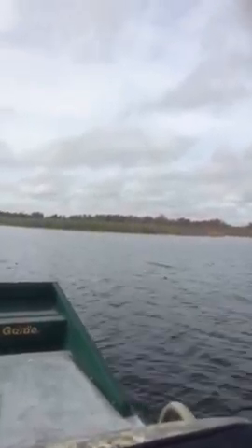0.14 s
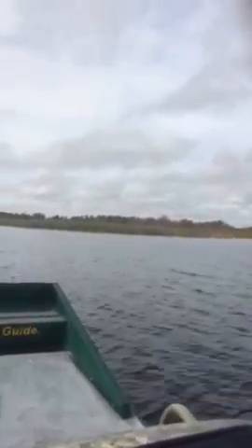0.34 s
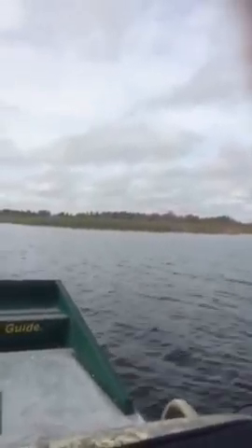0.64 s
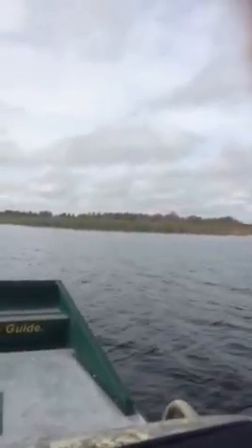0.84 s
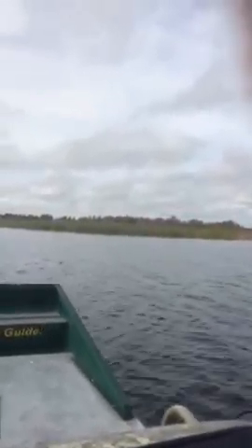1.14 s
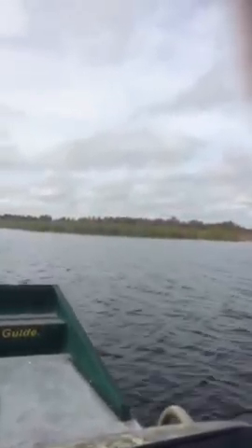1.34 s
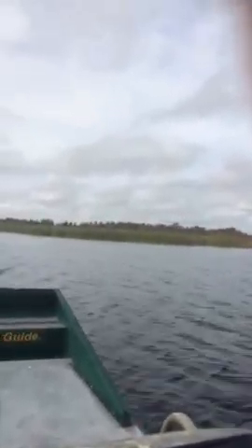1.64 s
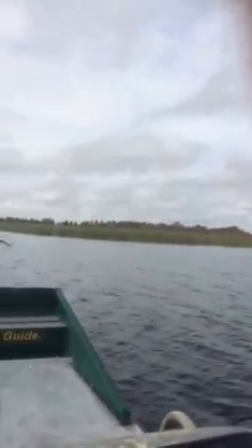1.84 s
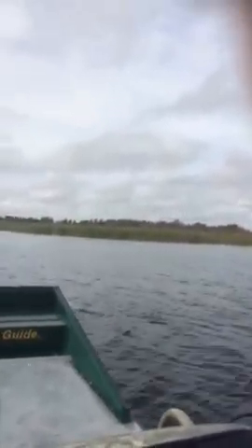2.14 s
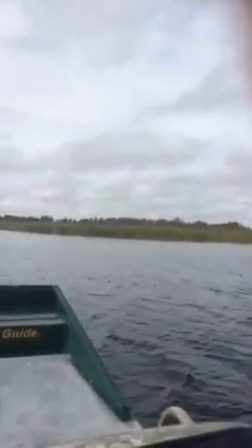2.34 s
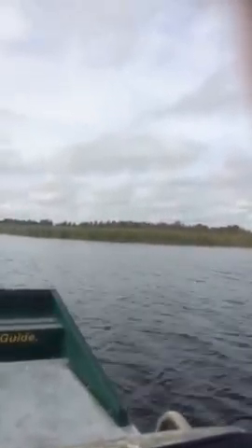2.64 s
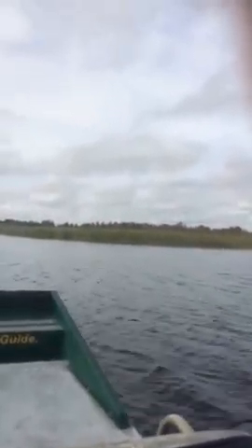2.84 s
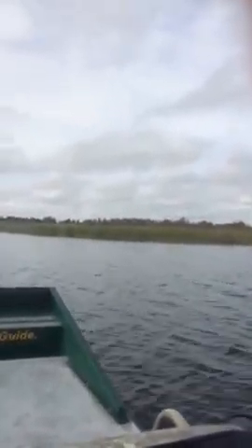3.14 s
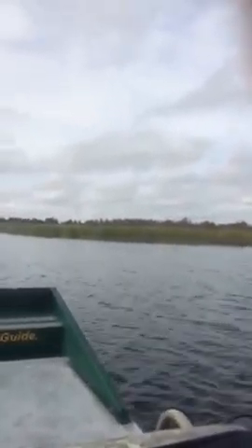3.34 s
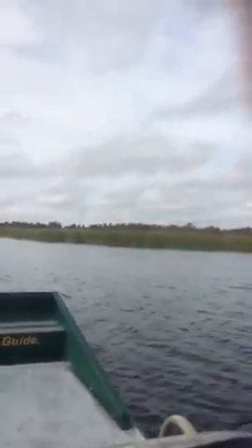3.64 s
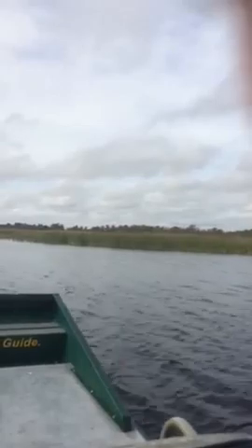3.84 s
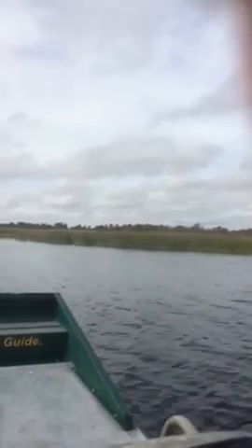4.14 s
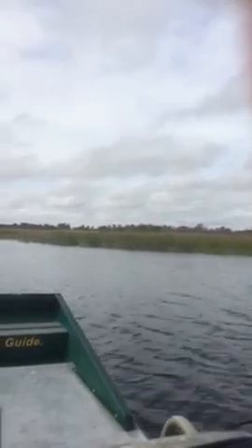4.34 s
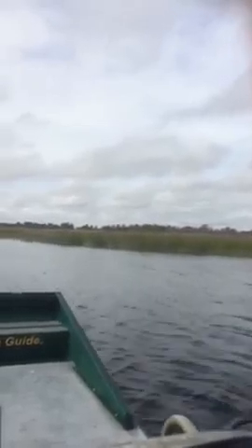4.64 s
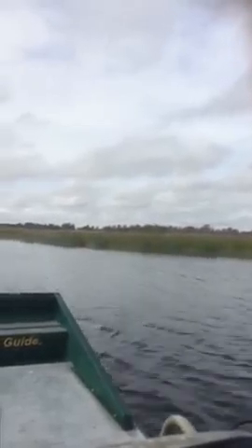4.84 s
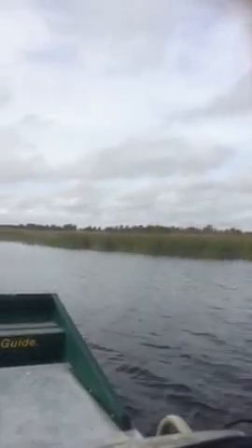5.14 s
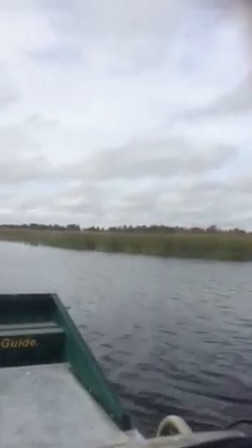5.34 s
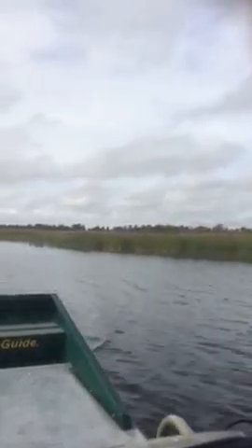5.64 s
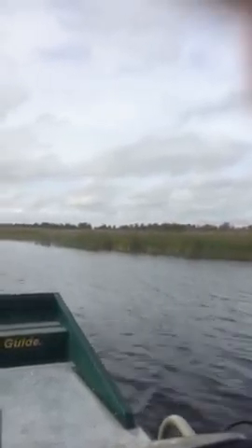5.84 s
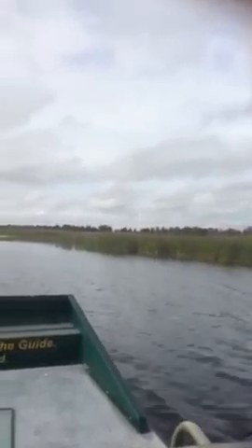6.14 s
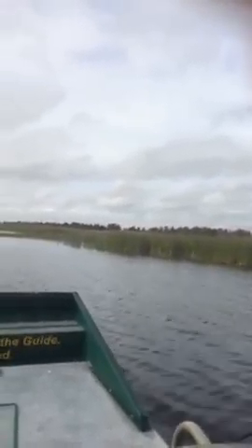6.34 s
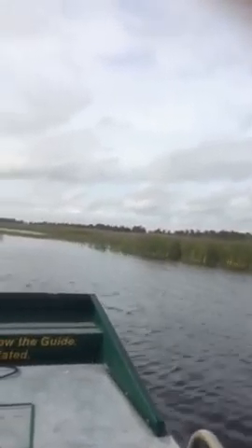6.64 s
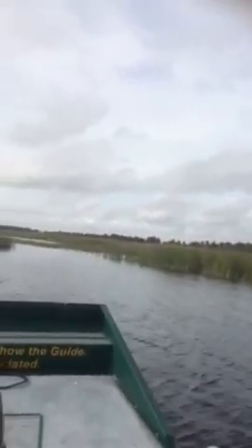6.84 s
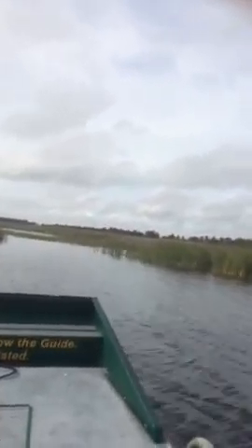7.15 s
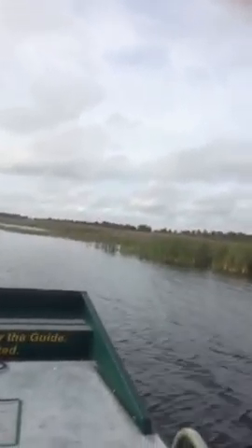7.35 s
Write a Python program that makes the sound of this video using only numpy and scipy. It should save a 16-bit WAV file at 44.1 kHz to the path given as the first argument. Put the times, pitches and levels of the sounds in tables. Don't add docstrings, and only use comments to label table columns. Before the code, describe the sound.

A loud, swaying airboat engine drone with a deep hum and propeller throb, wrapped in rushing wind hiss and scattered knocks of slapping water.

```python
import sys
import numpy as np
from scipy import signal
from scipy.fft import rfft, irfft
from scipy.io import wavfile
from scipy.ndimage import uniform_filter1d, minimum_filter1d

SR = 44100
rng = np.random.default_rng(int(sys.argv[2]) if len(sys.argv) > 2 else 0)


def voltage_ratio(decibels):
    exponent = np.asarray(decibels, float) / 20
    return 10 ** exponent


def generate_wav(signal):
    frames = np.transpose(np.atleast_2d(signal))
    scaled = np.clip(frames, -1, 1) * 32767
    pcm = np.round(scaled).astype(np.int16)
    wavfile.write(sys.argv[1], SR, pcm)


N = 330750

# (time [s], firing rate [Hz])
ENGINE_SPEED = [(0, 203.2), (.75, 201.7), (1.25, 201.4), (1.5, 201.8), (1.8, 201.2), (2, 200.4),
                (2.25, 198.4), (2.5, 197.4), (2.75, 197.0), (3.25, 198.0), (3.75, 198.7), (4.25, 198.2),
                (4.75, 195.8), (5.5, 192.4), (6, 190.5), (6.25, 188.7), (6.75, 188), (7.5, 187.8)]
# (time [s], settling time [s])
THROTTLE_EASINGS = [
    (2.07, 0.11),
    (5.15, 1),
    (6.5, 0.23),
]
EXHAUST_ORDERS = {5: (-14, -12, -14, -16.5), 8: (-13.5, -14, -7, -8.5), 11: (-26.5, -22, -41, -29),
                  24: (-49, -50, -37.5, -44)}
# (order [per camshaft turn], level [dB])
UNEVEN_ORDERS = [(4, -28), (6, -28), (9, -32), (10, -35.5), (12, -37)]
# (time [s], length [s], rise [dB])
FIRING_SURGES = [
    (.25, 0.22, 2),
    (.95, 1, 2.5),
    (2.4, 0.41, 1),
    (3.75, 0.22, 1.5),
    (4.2, .4, 2),
    (4.8, 0.46, 1.5),
]
BLADE_LEVELS = {1: (-19.5, -25.5, -23, -41), 2: (-15.5, -19, -19, -24), 3: (-22, -29.5, -27, -37.5),
                4: (-29, -39, -48, -32.5), 6: (-37, -42.5, -33.5, -33.5)}
# (multiple [of blade passing], level [dB])
HIGH_BLADE_TONES = [(5, -42.5), (7, -49.5), (8, -43), (9, -46.5), (10, -46), (12, -56.5)]
# (time [s], level [dB])
BLADE_BITE = [(0, 0.5), (.4, 0), (1.1, -1), (1.9, -1.5), (2.25, -4), (2.6, 1.5), (3, -9.5), (3.4, 4.5),
              (4.1, -0.5), (4.5, 2.5), (4.9, -1.5), (5.3, -11.5), (5.7, -6), (6.4, 0.5), (7.1, 0.5),
              (7.5, -1)]
# (time [s], length [s], rise [dB])
GEAR_LOADS = [
    (1.3, .6, 6.5),
    (1.87, .25, 11),
    (2.4, 0.37, 11),
    (3.2, 0.76, 10),
    (3.8, .3, 6.3),
    (4.4, .4, 10),
    (4.95, .2, 8.2),
    (5.17, 0.27, 15.6),
    (5.95, 0.29, 10),
    (6.2, 0.22, 10),
]
# (frequency [Hz], density [dB per Hz])
BUFFET_SPECTRUM = [(20, -8), (35, -5), (55, 5.5), (95, 3.5), (150, 0), (230, -5.5), (400, -17)]
# (frequency [Hz], density [dB per Hz])
ROAR_SPECTRUM = [(200, -1), (290, -2.5), (400, -7), (600, -11), (900, -10.5), (1300, -16.5), (1650, -16.5),
                 (2200, -24.5), (3200, -35.5)]
# (frequency [Hz], density [dB per Hz])
HISS_SPECTRUM = [(900, -2.5), (1700, -4), (2700, -2.5), (4500, -4.5), (6500, -6), (8250, -10),
                 (10000, -14.5), (11500, -20), (15300, -19)]
# (time [s], length [s], rise [dB])
WIND_GUSTS = [(.185, 0.049, 21), (.36, 0.065, 15), (.55, 0.21, 4), (.79, 0.061, 0.5), (.92, 0.13, -1),
              (1.14, 0.06, 8), (1.33, 0.067, 17), (1.52, 0.04, 10), (1.76, 0.12, 8), (1.91, 0.11, -3),
              (2.03, 0.14, 8.5), (2.36, 0.17, 9), (2.56, 0.065, -8), (2.76, 0.16, 2), (3.02, 0.045, 10),
              (3.13, 0.11, 3.5), (3.26, 0.048, 8), (3.35, 0.054, 6), (3.5, 0.04, 9.5), (3.63, 0.06, 6.5),
              (3.88, .22, 10), (4.05, .06, -7), (4.28, 0.16, 11.5), (4.43, 0.056, 11), (4.81, 0.07, 4),
              (5.18, 0.098, 7.5), (5.37, 0.091, 6), (5.65, 0.086, 12), (6.32, 0.22, 7.5),
              (6.81, 0.075, 4.5)]
# (time [s], length [s], rise [dB])
SPRAY_SHEETS = [(.07, 0.12, 1), (.23, .05, 1), (.54, 0.032, 4), (.66, 0.22, 2), (.73, .06, 3),
                (.95, 0.47, 1.5), (1.18, 0.17, 2.5), (1.28, 0.12, 2.5), (1.42, 0.19, 1.5), (1.58, .06, 2),
                (1.7, 0.054, 2.5), (1.86, 0.094, 1.5), (1.98, 0.043, -1.5), (2.09, 0.05, 3.5),
                (2.36, .15, 3), (2.95, 0.073, 1.5), (3.04, .05, 2), (3.27, .07, 1.5), (3.38, 0.11, 1.5),
                (3.57, .06, 2.5), (3.66, 0.038, 2), (3.89, 0.21, 1.5), (4.0, 0.1, 2.5), (4.18, 0.3, 1.5),
                (4.37, 0.098, 1.5), (4.54, 0.063, -4), (5.57, .1, 0.5), (7.4, .06, 3.5)]
# (time [s], air pocket pitch [Hz], pocket level [dB], splash level [dB])
HULL_SLAPS = [(.042, 504, -4.5, -22), (.529, 402, 3.5, -12), (.652, 355, -5, -17.5), (.869, 496, -7, -26),
              (.961, 507, -7, -16), (1.058, 520, -3, -15), (1.383, 1800, -13, -18), (1.422, 1020, -23, -19),
              (2.093, 2800, -26, -24), (2.385, 660, -12, -18), (2.668, 680, -20, -25),
              (3.027, 755, -6.5, -18), (3.031, 1510, -13, -18.5), (3.239, 845, -15, -35),
              (3.27, 595, -10, -25), (3.553, 760, -8, -20), (3.648, 2540, -65, -18), (3.915, 460, -19, -17),
              (4.14, 386, -6, -21), (4.534, 620, -8, -19.5), (4.547, 940, -14, -16),
              (5.003, 395, -8, -18.5), (5.566, 2000, -27.5, -20), (5.649, 465, -5, -18.5),
              (5.94, 1300, -23.5, -22), (6.774, 920, -14, -20.5), (6.904, 700, -14, -26.5),
              (7.131, 1280, -24, -22), (7.379, 374, -7.5, -24), (7.387, 606, -9, -19.5)]

# (open [dB], eased [dB], low [dB], cruise [dB])
BUFFET_DB, ROAR_DB, HISS_DB = (-27, -26, -26.5, -23.5), (-24.5, -25.5, -26.5, -27), (-31, -32, -34.5, -34.5)
EDDY_DB = (-32.5, -33.5, -38.5, -36.5)
WHINE_BELOW_DB, WHINE_ABOVE_DB = (-62, -55, -63, -64), (-62, -64, -56, -52.5)

BLADES_PER_CAM_TURN, TEETH_PER_CAM_TURN = 3.492, 96.0


def in_time(rows):
    s, *columns = np.transpose(rows)
    return [np.interp(np.arange(N) / SR, s, c) for c in columns]


def by_throttle(levels_db):
    t = np.arange(N) / SR
    level_db = levels_db[0]
    for step_db, (s, settle_s) in zip(np.diff(levels_db), THROTTLE_EASINGS):
        level_db = level_db + step_db * (0.5 + 0.5 * np.tanh(2 * (t - s) / settle_s))
    return level_db


def swells(rows):
    t = np.arange(0, N, 20) / SR
    rises_db = [db * np.exp(-(2 * (t - s) / length) ** 2) for s, length, db in rows]
    return np.interp(np.arange(N) / SR, t, np.max(rises_db, axis=0))


def rms_one(x):
    return x / np.sqrt(np.mean(x ** 2) + 1e-20)


def drift(rate):
    r = np.exp(-40 * np.pi * rate / SR)
    white = rng.standard_normal(N // 20 + 4002)
    slow = signal.lfilter([1], [1, -2 * r, r * r], white)[4000:]
    return np.interp(np.arange(N) / 20, np.arange(len(slow)), rms_one(slow - slow.mean()))


def coloured(spectrum):
    hz, level_db = np.transpose(spectrum)
    grid = np.arange(1, N // 2 + 2) * SR / N
    octaves_outside = np.maximum(np.log2(hz[0] / grid), 0) + np.maximum(np.log2(grid / hz[-1]), 0)
    shape = voltage_ratio(np.interp(np.log(grid), np.log(hz), level_db) - 11.5 * octaves_outside)
    return rms_one(irfft(rfft(rng.standard_normal(N)) * shape, N))


def evened(noise, span_s, share):
    swell = uniform_filter1d(noise ** 2, int(span_s * SR)) + 1e-3
    return rms_one(noise / swell ** (share / 2))


def tone(turns, order, level_db, sway_db, sway_rad):
    phase = 2 * np.pi * (order * turns + rng.random()) + sway_rad * drift(5.6)
    return np.sqrt(2) * voltage_ratio(level_db + sway_db * drift(6.6)) * np.sin(phase)


def eddies():
    edges = np.geomspace(242.5, 602, 4)
    rumble = np.zeros(N)
    for k in range(3):
        band_pass = signal.butter(2, edges[k:k + 2], "band", fs=SR, output="sos")
        band = rms_one(signal.sosfilt(band_pass, rng.standard_normal(N)))
        rumble += voltage_ratio(4.1 * drift(9.9)) * band
    return voltage_ratio(by_throttle(EDDY_DB)) * rumble


def air():
    gusts_db, spray_db, speed = swells(WIND_GUSTS), swells(SPRAY_SHEETS), in_time(ENGINE_SPEED)[0]
    stream_db = 0.0552 * (speed - speed.mean()) - 0.05 * gusts_db
    gust = drift(21.0)
    buffet_db = by_throttle(BUFFET_DB) + gusts_db + 4.0
    buffet = voltage_ratio(buffet_db) * evened(coloured(BUFFET_SPECTRUM), span_s=0.11, share=1.0)
    roar_db = by_throttle(ROAR_DB) + stream_db + 0.99 * spray_db + 1.45 * gust + 2.2 * drift(90.0)
    roar = voltage_ratio(roar_db) * coloured(ROAR_SPECTRUM)
    hiss_db = by_throttle(HISS_DB) + stream_db + spray_db - 0.58 + 0.71 * gust + 2.16 * drift(180.0)
    hiss = voltage_ratio(hiss_db) * coloured(HISS_SPECTRUM)
    return buffet + roar + hiss


def slaps():
    pocket_s, splash_s, attack_s = 0.0062, 0.0066, 0.0019
    out, size = np.zeros(N), 1800
    t = np.arange(size) / SR
    age = t / pocket_s
    broad = signal.butter(2, [400, 2200], "band", fs=SR, output="sos")
    crack = 11 * (np.arange(size) == 90)
    for s, hz, pocket_db, splash_db in HULL_SLAPS:
        ring = np.sin(2 * np.pi * hz * t * (1 + 0.035 * age))
        pocket = voltage_ratio(pocket_db - 2.0) * ring * np.exp(-age ** 1.5)
        spatter = rms_one(signal.sosfilt(broad, rng.standard_normal(size) + crack))
        splash = voltage_ratio(splash_db) * spatter * np.exp(-(t / splash_s) ** 0.78)
        at = round((s - 0.001) * SR)
        out[at:at + size] += np.minimum(t / attack_s, 1) * (pocket + splash)
    return out


def whine(turns):
    below = tone(turns, TEETH_PER_CAM_TURN - 2, by_throttle(WHINE_BELOW_DB), 6.1, 0.37)
    above = tone(turns, TEETH_PER_CAM_TURN + 2, by_throttle(WHINE_ABOVE_DB), 1.6, 0.3)
    teeth = tone(turns, TEETH_PER_CAM_TURN, -56 + swells(GEAR_LOADS), 1.4, 0.3)
    return teeth + below + above


def propeller(turns):
    passes = BLADES_PER_CAM_TURN * turns
    bite_db, = in_time(BLADE_BITE)
    low = sum(tone(passes, k, by_throttle(BLADE_LEVELS[k]) + bite_db, 2.2, 0.3) for k in (1, 2, 3, 4))
    third_db = by_throttle(BLADE_LEVELS[3]) + bite_db
    load_db = 0.5 * (third_db - third_db.mean())
    high = sum(tone(passes, k, db + load_db + 2.0, 3.3, 0.59) for k, db in HIGH_BLADE_TONES)
    sixth = tone(passes, 6, by_throttle(BLADE_LEVELS[6]), 1.6, 0.46)
    return low + high + sixth


def engine(turns):
    firing_db = by_throttle(EXHAUST_ORDERS[8]) + swells(FIRING_SURGES)
    strong = tone(turns, 8, firing_db, 1.0, 0.03)
    strong += tone(turns, 5, by_throttle(EXHAUST_ORDERS[5]), 0.87, 0.048)
    strong += tone(turns, 11, by_throttle(EXHAUST_ORDERS[11]), 1.3, 0.033)
    strong += tone(turns, 24, by_throttle(EXHAUST_ORDERS[24]), 3.5, 0.24)
    fade_db = -0.35 * (firing_db - firing_db.mean())
    weak = sum(tone(turns, order, db + fade_db, 0.62, 0.28) for order, db in UNEVEN_ORDERS)
    return strong + weak


def scene():
    turns = np.cumsum(in_time(ENGINE_SPEED)[0]) / 8 / SR
    mix = eddies() + air() + slaps() + whine(turns) + propeller(turns) + engine(turns)
    return mix[None]


def limiter(x, drive_db, top, release_db_s, attack_s):
    x = x * voltage_ratio(drive_db)
    over_db = np.maximum(20 * np.log10(np.abs(x) / top + 1e-9), 0)
    ramp = release_db_s * np.arange(N) / SR
    held_db = np.maximum.accumulate(over_db + ramp) - ramp
    ahead = max(int(attack_s * SR), 3)
    return x * uniform_filter1d(minimum_filter1d(voltage_ratio(-held_db), ahead), ahead)


def roll_off(x):
    return signal.sosfilt(signal.butter(12, 15320, fs=SR, output="sos"), x)


def record(dry):
    held = limiter(dry[0], drive_db=1.0, top=1.0, release_db_s=528.0, attack_s=0.0052)
    return roll_off(held[None])


dry = scene()
out = record(dry)
generate_wav(out)
```